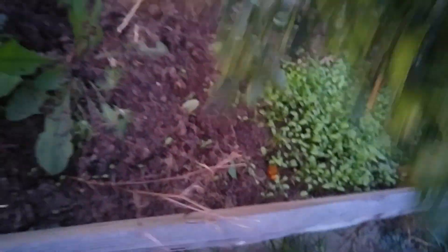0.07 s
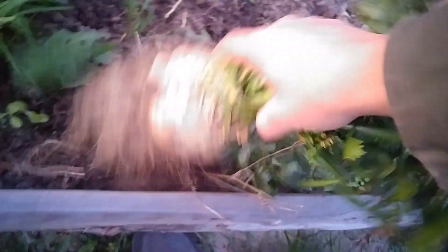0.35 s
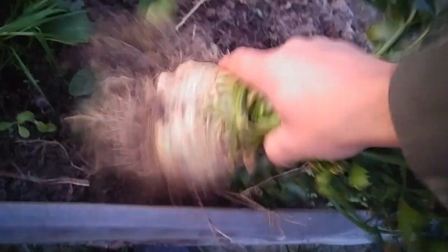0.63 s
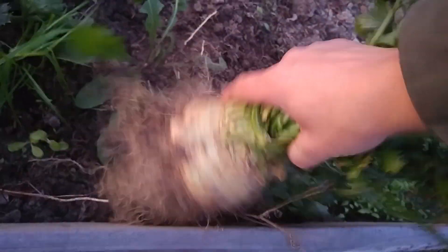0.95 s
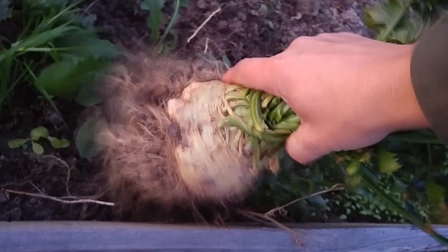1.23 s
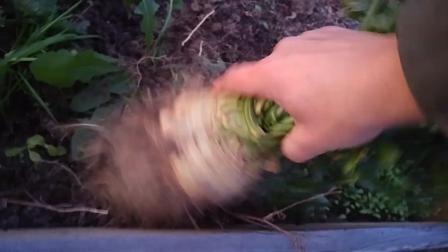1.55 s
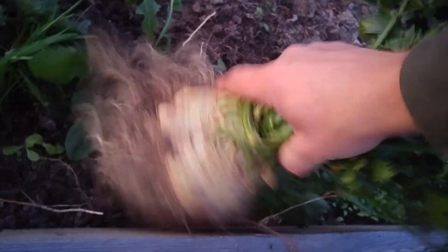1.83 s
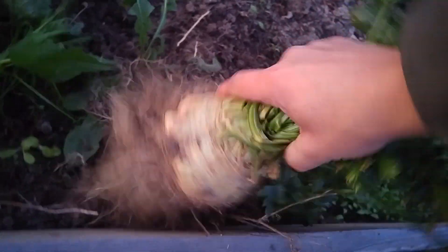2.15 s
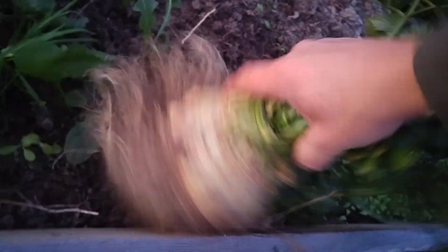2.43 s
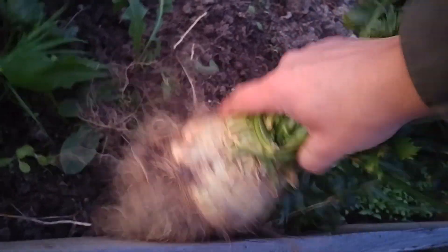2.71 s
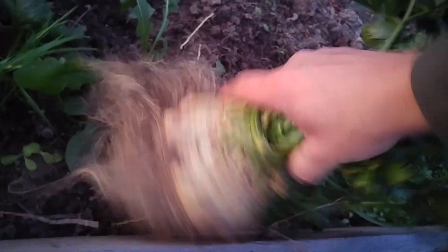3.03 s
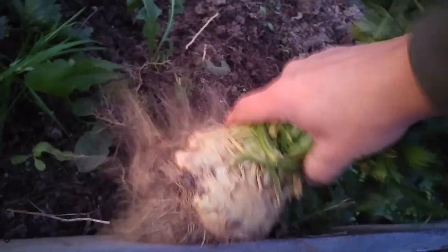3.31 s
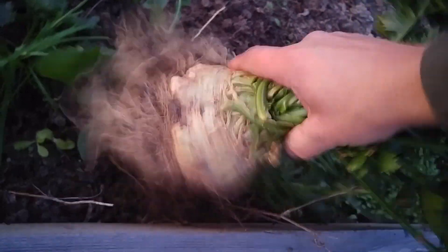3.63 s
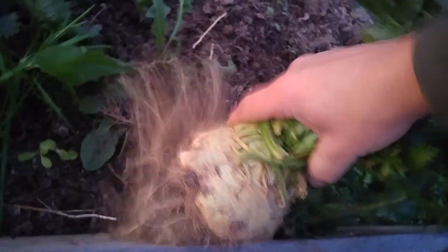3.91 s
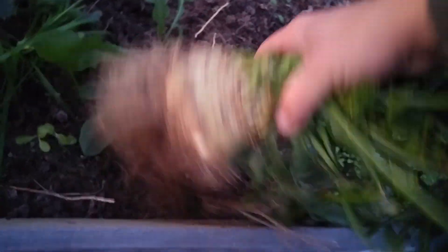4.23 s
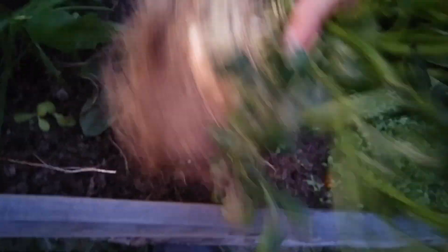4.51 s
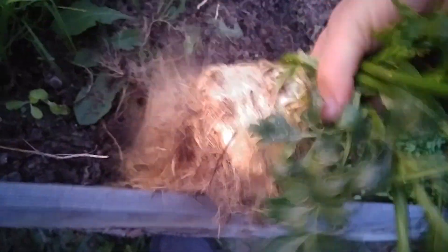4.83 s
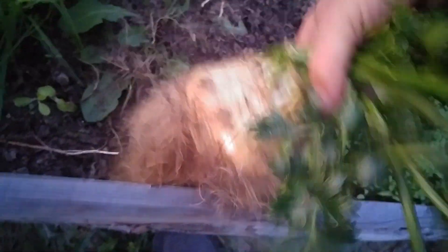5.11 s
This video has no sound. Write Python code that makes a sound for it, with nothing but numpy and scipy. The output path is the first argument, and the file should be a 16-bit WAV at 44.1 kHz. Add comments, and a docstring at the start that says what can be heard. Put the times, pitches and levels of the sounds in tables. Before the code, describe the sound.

Close up and outdoors, with no echo, an earthy root bulb thumps a wooden board in a fast, even run of about twenty knocks. The roots brush, grit crunches and soil scatters with every blow, while the stalks rub in a fist and sometimes snap. Near the end the beat breaks off for a louder, crackling rustle of leaves that shifts slightly right, then a single final knock lands.

```python
"""At the wooden edge of a garden bed, a celeriac root held by its stalks is knocked five times a second.
On each swing the earthy root beard lands first; then the bulb's impact excites the board's damped
modes and soil sprays off as granular noise. The plant rumbles and rubs in the fist, with one faint
squeak. Many small contacts make the leaves swish and snap all along, loudest when the plant is
turned over before one last knock."""
import sys
import numpy as np
from scipy import signal
from scipy.fft import rfft, irfft, next_fast_len
from scipy.io import wavfile
from scipy.ndimage import map_coordinates

SR = 44100
rng = np.random.default_rng(int(sys.argv[2]) if len(sys.argv) > 2 else 0)


def wav_record(signal):
    """Record a signal, one row per channel, as 16-bit PCM in the file named by sys.argv[1]."""
    frames = np.transpose(np.atleast_2d(signal))
    bounded = np.clip(frames, -1, 1)
    # unit amplitude maps onto the largest positive 16-bit level
    quanta = np.round(bounded * 32767).astype(np.int16)
    wavfile.write(sys.argv[1], SR, quanta)


N = 227244
T = np.arange(SR // 3) / SR  # time within one event [s]

# Levels are relative; pan is left minus right; softness is the loss of level with frequency.
# motion of hand and stalks: (time [s], rumble level [dB], rub level [dB])
HANDLING_LEVELS = [(0, -37, -55.5), (.26, -36, -51.5), (.47, -35.5, -56), (.9, -35.5, -56),
                   (1.3, -41.5, -54), (2.9, -45, -54.5), (3.3, -40, -53), (4.05, -38, -52.5),
                   (4.35, -42, -47.5), (4.55, -47, -44.5), (5.15, -35.5, -54)]
# stirring of the leaves, strongest as the plant is turned over: (time [s], level [dB])
LEAF_LEVELS = [(0, -53.5), (.16, -42), (.4, -37.5), (.67, -37), (1, -39.5), (1.7, -40.5), (2.9, -41),
               (4.15, -38.5), (4.33, -31), (4.395, -28), (4.49, -33), (4.585, -26.5), (4.63, -33),
               (4.77, -32), (4.81, -27.5), (4.93, -30), (5.03, -34), (5.15, -29)]
# the leaves move to the right during that turn: (time [s], pan [dB])
LEAF_PAN = [(0, 1), (1.9, 0), (4.1, -1), (4.45, -4.5), (5.15, -3.5)]
# snaps of single stalks: (time [s], level [dB], pan [dB], t60 [s])
STALK_SNAPS = [(.22, -25, 0, 0.038), (.2635, -10.5, 0, 0.025), (.2687, -19, 15, 0.012),
               (1.6278, -28, 2, .01), (2.085, -13, 7, .018), (2.663, -18, -3, 0.018),
               (2.876, -16, -3.5, .016), (3.216, -21, -6, 0.017), (3.4232, -19.5, -9, 0.011),
               (3.4614, -28, -3, 0.026), (4.0782, -8.5, -3, .016), (4.393, -17, -9, 0.034),
               (4.432, -16.5, -10, 0.016), (4.8386, -13.5, -15, 0.011), (5.075, -13, 6, 0.037)]
# blows of the bulb on the board: (time [s], level [dB], softness [dB/kHz])
BLOWS = [(0.2792, 1.5, 3.5), (0.521, 1, 16), (0.7003, 1, 9.5), (0.9174, -0.5, 1.5), (1.117, -1, 3),
         (1.3216, -8, 5), (1.493, -4.5, 7), (1.6996, -2.5, 1.5), (1.9012, -2, 2.5), (2.101, -1.5, 2.5),
         (2.2824, -3, 4), (2.4905, -3.5, 4.5), (2.6838, -2, 4), (2.8899, -0.5, 2.5), (3.0961, -0.5, 1.5),
         (3.307, -.5, 2), (3.5096, 0, 2.5), (3.723, -0.5, 1.5), (3.9248, 0, 4.5), (4.0928, .5, 5),
         (5.0925, -3.5, 1)]
# modes of the board with the root on it: (frequency [Hz], level [dB], t60 [s], pan [dB])
BOARD_MODES = [(83.7, -18.5, 0.13, 1.5), (104.6, -22, 0.099, 2), (147.4, -21.5, 0.16, 0.5),
               (196.5, -15, 0.13, 1.5), (216.6, -17.5, 0.15, 0.5), (290.6, -10, 0.056, -5),
               (413, -32, 0.13, -2), (567.7, -11, 0.093, 1), (614, -7.5, 0.059, 0), (684.3, -9.5, 0.07, 2),
               (768.4, -13, 0.082, 4.5), (851, -18.5, 0.072, -5.5), (961, -21, 0.083, 10.5),
               (1077, -7.5, 0.032, 6.5), (1155, -13, 0.057, 8), (1373, -18, 0.045, 1.5),
               (1517, -17, 0.038, -3.5), (1965.5, -45, 0.04, 25), (2160, -39, 0.08, 10),
               (2716, -25, 0.032, 10)]
# the bulb settling after a blow: (delay [s], level re blow [dB], softness [dB/kHz])
ROCKING_CONTACTS = [(.018, -9, 7.5), (.03, -4, 26.5), (.047, -11, 29), (.073, -15.5, 30)]
# the root grazing the board: (time [s], level [dB], softness [dB/kHz])
GRAZES = [(.352, -13, 14), (.384, -2.5, 32), (.429, -15.5, 9), (.548, -12, 4), (.585, -7, 10),
          (.686, -1, 10), (.695, -5, 1), (.73, -16, 1), (.769, -11, 9), (.805, -10, 26), (.848, -12, 15),
          (.991, -11, 18), (1.022, -9, 33), (1.069, -10, 17), (1.519, 0, 21), (1.562, -11.5, 15),
          (2.518, -1, 25), (4.161, -6.5, 9.5), (4.189, -13, 17), (4.239, -14.5, 9), (4.314, -17, 19),
          (4.548, -21.5, -1), (4.852, 3.5, 46), (4.871, 2.5, 25.5), (4.912, -12, 9.5), (4.99, -12, 15),
          (5.122, -0.5, 22)]
# contacts on the back swing: (delay [s], level re blow [dB])
JOGGLE_CONTACTS = [(.102, -17), (.144, -16)]
# a faint squeak: (time [s], duration [s], frequency [Hz], level [dB])
SQUEAK_TONES = [(1.8, .07, 827, -41)]
# likeness of left and right noise: (frequency [Hz], correlation [-])
COHERENCE = [(100, 0.92), (220, 0.73), (400, 0.83), (900, 0.11), (3000, 0.017), (10000, 0.013)]
# noise spectra: (frequency [Hz], spectral density level [dB])
FIST_RUMBLE = [(20, -42), (45, -3), (85, 7.5), (160, -2.5), (280, -11), (400, -16), (520, -25),
               (1500, -29.5)]
STALK_RUB = [(400, -7.5), (520, -27), (650, 4), (850, 0.5), (1200, -4.5), (1700, -29), (3000, -34),
             (6000, -49)]
LEAF_SWISH = [(500, -8.5), (1200, -15), (2400, -16.5), (4000, -10.5), (5500, -7.5), (6500, -1.5), (7250, 3),
              (7850, -6), (8300, -3.5), (9500, -9.5), (12000, -23.5), (16000, -15.5)]
LEAF_CRACKLE = [(5000, -74), (8500, 1), (10500, 3.5), (13000, 2.5), (16000, 0.5)]
STALK_CRACK = [(800, -4), (2500, -12.5), (5000, -9), (7200, 9.5), (7850, 3), (9000, -2), (12000, -8),
               (16000, -0.5)]
BEARD_BRUSH = [(400, 2), (700, 14.5), (1400, 10.5), (2200, 0), (3500, 0), (5500, -2.5), (7100, 5),
               (8000, -21), (11000, -13), (16000, -21)]
GRIT_CRUNCH = [(700, 18), (1500, 7), (2200, -6), (2800, 4), (3400, 2.5), (5000, 5.5), (6600, 8.5),
               (7400, 0), (8200, -24), (11000, -22), (16000, -13)]
SOIL_SPRAY = [(300, 26), (1000, 36), (1600, 13), (2200, -11), (2700, -4.5), (3300, -9.5), (5000, -6),
              (6800, -2), (8000, -27), (11000, -5), (16000, 2)]
EARTH_SHUDDER = [(20, -30), (50, -53), (90, 14), (230, -9.5), (400, 0.5), (510, -1.5), (580, -14),
                 (800, -19), (1200, -26), (1800, -21.5), (3000, -26), (6000, -60)]


def amp(db):
    """Amplitude ratio: a factor of ten per 20 dB."""
    return 10 ** (np.asarray(db) / 20)


def unit(x):
    """Normalisation to rms 1."""
    return x / np.sqrt(np.mean(x ** 2) + 1e-20)


def decay(t60):
    """Exponential damping: 60 dB in t60 seconds."""
    return amp(-60 * T / t60)


def along(points, hz):
    """Interpolation of (frequency, value) points on a logarithmic axis."""
    freqs, values = np.transpose(points)
    return np.interp(np.log(hz + 1), np.log(freqs), values)


def curves(rows):
    """Linear interpolation in time: one envelope for each later column."""
    times, *columns = np.transpose(rows)
    return [np.interp(np.arange(N) / SR, times, column) for column in columns]


def wobble(rate):
    """Smooth random modulation: a spline through rate knots a second."""
    knots = rng.standard_normal(int(N * rate / SR) + 4)
    return map_coordinates(knots, [np.arange(N) * rate / SR])


def filtered(x, response):
    """Linear filtering: the spectrum is multiplied by a frequency response."""
    n = x.shape[-1]
    padded = next_fast_len(n + 4096)
    return irfft(rfft(x, padded) * response(np.fft.rfftfreq(padded, 1 / SR)), padded)[..., :n]


def panned(pan_db):
    """Direction by level difference: left and right gains."""
    return amp(np.array([[1], [-1]]) * pan_db / 2)


def noise(spectrum, size, spiky_db=0):
    """Partly coherent stereo noise of rms 1; spiky_db scatters the levels of its tiny grains."""
    grains = amp(spiky_db * np.repeat(rng.standard_normal(size // 20 + 1), 20)[:size])
    angle = lambda hz: np.arccos(np.clip(along(COHERENCE, hz), -1, 1)) / 2
    colour = lambda hz: amp(along(spectrum, hz)) * [np.cos(angle(hz)), np.sin(angle(hz))]
    mid, side = filtered(grains * rng.standard_normal((2, size)), colour)
    return unit(np.array([mid + side, mid - side]))


def burst(spectrum, rise_s, t60, spiky_db=0):
    """A noise transient with exponential rise and decay."""
    return noise(spectrum, len(T), spiky_db) * (1 - np.exp(-T / rise_s)) * decay(t60)


def patter(rate, size_db):
    """A Poisson process of rms 1: rate impulses a second, of uneven size."""
    impulses = (rng.random(N) < rate / SR) * rng.choice([-1, 1], N)
    return unit(impulses * amp(size_db * np.minimum(rng.exponential(size=N), 3)))


def add(track, s, sound):
    """Superposition of a sound on the track at time s."""
    start = max(round(s * SR), 0)
    part = track[:, start:start + sound.shape[-1]]
    part += sound[:, :part.shape[-1]]


def handling():
    """Friction in the fist rumbles and rubs; from the first knock on, clods land as damped pulses."""
    rumble_db, rub_db = curves(HANDLING_LEVELS)
    rumble = amp(rumble_db - 5.5 + 3.6 * wobble(28)) * noise(FIST_RUMBLE, N)
    clod = np.sin(2 * np.pi * 210 * T) * (1 - np.exp(-T / .003)) * decay(.012)
    falling = np.arange(N) / SR > BLOWS[0][0]
    landings = falling * patter(rate=25, size_db=.5)
    clods = amp(rumble_db - 7) * unit(signal.fftconvolve(landings, clod)[:N])
    rub = amp(rub_db + .5 + 2 * wobble(30)) * noise(STALK_RUB, N, spiky_db=4)
    return rumble + clods + rub


def leaves():
    """Countless leaf and crumb contacts sum incoherently to clumps of noise, with single ticks on top."""
    stir_db, = curves(LEAF_LEVELS)
    pan_db, = curves(LEAF_PAN)
    swell_db = swing()
    clumps = unit(amp(1.1 * wobble(20) + 1.1 * wobble(90) + 1.3 * wobble(400)))
    swish = amp(1.5) * noise(LEAF_SWISH, N, spiky_db=2.5)
    crackle = amp(-5.5) * noise(LEAF_CRACKLE, N, spiky_db=4)
    tick_power = signal.fftconvolve(patter(rate=80, size_db=2.8) ** 2, decay(.006))[:N]
    ticks = amp(-11.5) * unit(np.sqrt(np.abs(tick_power))) * noise(LEAF_SWISH, N)
    rustle = clumps * (swish + crackle) + ticks
    direction = panned(pan_db + .33 * swell_db)  # each swell leans to the left
    return amp(stir_db + swell_db) * direction * rustle


def swing(lead_s=.011, rise_s=.038, fall_s=.034):
    """Amplitude modulation of the rustle [dB]: it builds on each down stroke and dies after the knock."""
    swell_db = np.zeros(N)
    for s, db, _ in BLOWS:
        t = np.arange(N) / SR - s + lead_s
        swell_db += 8.5 * amp(db / 2) * np.exp(np.minimum(t / rise_s, -t / fall_s))
    return swell_db


def snaps(whip_lead_s=.016):
    """Brief contacts have broad spectra: stalks flick together as each swing ends, and singly between."""
    out = np.zeros((2, N))
    whips = [(s - whip_lead_s, db - 40 + 2.5 * rng.standard_normal(), -1.5, .022) for s, db, _ in BLOWS]
    for s, db, pan_db, t60 in whips + list(STALK_SNAPS):
        add(out, s, amp(db) * panned(pan_db) * burst(STALK_CRACK, rise_s=.0004, t60=t60, spiky_db=2))
    return out


def knocks(brush_lead_s=.024, push_lead_s=.01988):
    """Impact: the beard cushions the swing, the bulb stops dead, grit is crushed and soil sprays."""
    out = np.zeros((2, N))
    rings = board([(db, softness) for _, db, softness in BLOWS])
    push = -panned(3.4) * force_pulse(hz=125, width_s=.0032, centre_s=.0102)
    thud = panned(-.5) * force_pulse(hz=175, width_s=.0034, centre_s=.00498)
    for (s, db, _), ring in zip(BLOWS, rings):
        beard_db, grit_db = 1.5 * db, 2.95 * db  # both grow faster than the blow
        brush = burst(BEARD_BRUSH, rise_s=.013, t60=.12, spiky_db=3)
        add(out, s - brush_lead_s, amp(beard_db - 21) * brush)
        add(out, s - push_lead_s, amp(beard_db - 16) * push)
        add(out, s, ring + amp(db - 8) * thud)
        add(out, s, amp(grit_db - 14.5) * burst(GRIT_CRUNCH, rise_s=.00037, t60=.019, spiky_db=3.5))
        add(out, s, amp(grit_db - 23.5) * burst(SOIL_SPRAY, rise_s=.005, t60=.13, spiky_db=7))
        add(out, s, amp(db - 14) * burst(EARTH_SHUDDER, rise_s=.0043, t60=.12))
    return out


def force_pulse(hz, width_s, centre_s):
    """A mass brought to rest gives up its momentum in one low shove: a Gaussian-windowed sine."""
    t = T - centre_s
    return np.sin(2 * np.pi * hz * t) * np.exp(-(t / width_s) ** 2)


def board(blows, damping=1, rise_s=.00023, lag_s=.00046):
    """Modal ringing for each (level, softness) blow; a soft contact barely excites the high modes."""
    hz, mode_db, t60, pan_db = np.transpose(BOARD_MODES)
    # short waves reach the left side first; long ones arrive together
    delay = np.array([np.zeros(len(hz)), lag_s * (hz > 250)])
    t = np.maximum(T - delay[..., None], 0)
    envelopes = amp(-60 * t * damping / t60[:, None]) * (1 - np.exp(-t / rise_s))
    modes = np.sin(2 * np.pi * hz[:, None] * t) * envelopes
    polarity = (-1) ** np.arange(len(hz))
    modes *= (panned(pan_db) * polarity)[..., None]
    blow_db, softness = np.transpose(blows)[..., None]
    # each landing spot gives the modes slightly new strengths
    scatter_db = rng.standard_normal((len(blows), len(hz))) * np.minimum(hz / 500, 2)
    gains = amp(blow_db + mode_db - softness * hz / 1000 + scatter_db)
    return amp(-20.5) * (gains @ unit(modes)).swapaxes(0, 1)


def rocking():
    """Secondary impacts: the knobbly bulb rolls over a few more points, a little differently each time."""
    out = np.zeros((2, N))
    for delay, relative_db, softness in ROCKING_CONTACTS:
        rings = board([(db + relative_db, softness) for _, db, _ in BLOWS], damping=2, rise_s=.001)
        for (s, _, _), ring in zip(BLOWS, rings):
            add(out, s + delay * (1 + .0583 * rng.standard_normal()), ring)
    return out


def bumps():
    """Contact damping: in glancing blows the soft roots stay on the board and choke its ring."""
    out = np.zeros((2, N))
    contacts = list(GRAZES) + joggles()
    rings = board([(db, softness) for _, db, softness in contacts], damping=2.8, rise_s=.0012)
    for (s, _, _), ring in zip(contacts, rings):
        add(out, s, ring)
    return out


def joggles(scatter_s=.002, scatter_db=2, softness=20):
    """Faint back-swing impacts (time, level, softness), their amplitude proportional to the blow's."""
    contacts = []
    for s, db, _ in BLOWS:
        for delay, relative_db in JOGGLE_CONTACTS:
            late, loud = rng.standard_normal(2)
            contacts.append((s + delay + scatter_s * late, db + relative_db + scatter_db * loud, softness))
    return contacts


def squeaks(climb_per_s=.6, waver=.025):
    """Frequency modulation: a thin tone wavers and climbs a little as it swells and fades."""
    out = np.zeros((2, N))
    for s, duration, hz, db in SQUEAK_TONES:
        pitch = hz * (1 + climb_per_s * (T - duration / 2) + waver * wobble(160)[:len(T)])
        envelope = np.sin(np.pi * np.minimum(T / duration, 1))
        tone = np.sin(2 * np.pi * np.cumsum(pitch) / SR)
        add(out, s, amp(db) * panned(0) * envelope * tone)
    return out


def scene():
    """Free field: the direct sounds add at arm's length in the open air."""
    return knocks() + rocking() + bumps() + snaps() + leaves() + handling() + squeaks()


def record(dry, bass_hz=48, notch_hz=487, top_hz=15900, hardness=5):
    """The microphone filters out deep bass and a narrow band; the recorder saturates and band-limits."""
    thin = signal.sosfilt(signal.butter(3, bass_hz, "highpass", fs=SR, output="sos"), dry)
    hollow = signal.lfilter(*signal.iirnotch(notch_hz, Q=7, fs=SR), thin)
    rounded = hollow / (1 + np.abs(hollow) ** hardness) ** (1 / hardness)
    return filtered(rounded, lambda hz: hz < top_hz)


dry = scene()
out = record(dry)
wav_record(out)
```